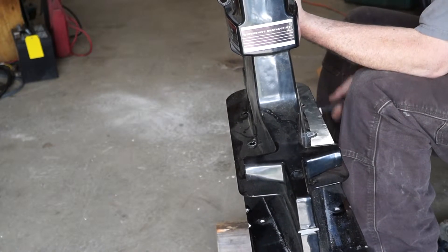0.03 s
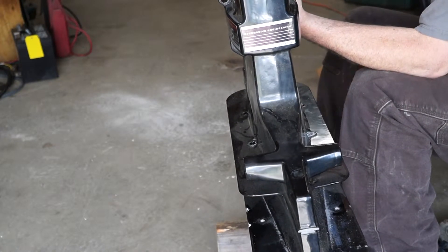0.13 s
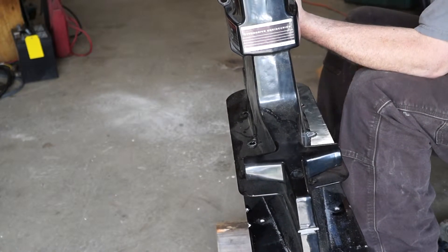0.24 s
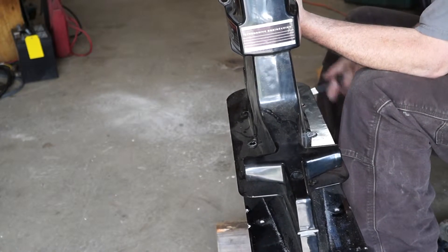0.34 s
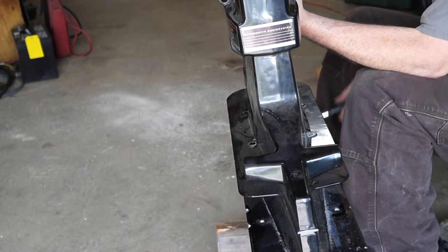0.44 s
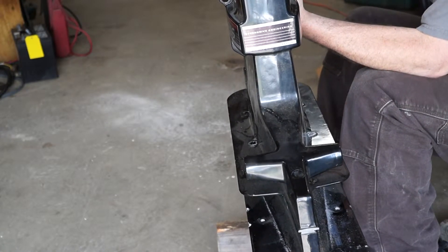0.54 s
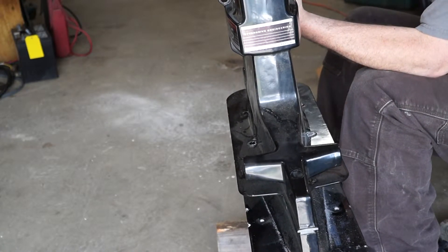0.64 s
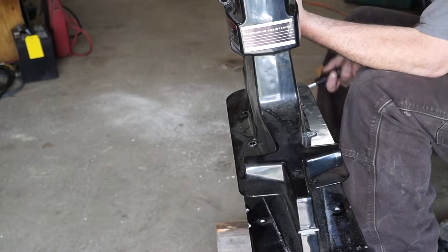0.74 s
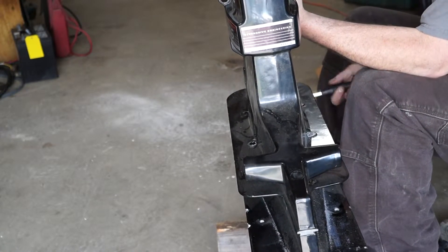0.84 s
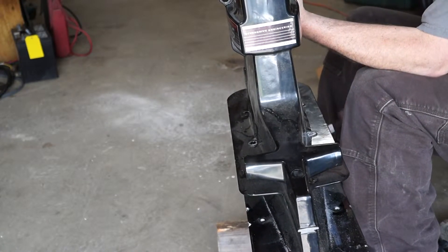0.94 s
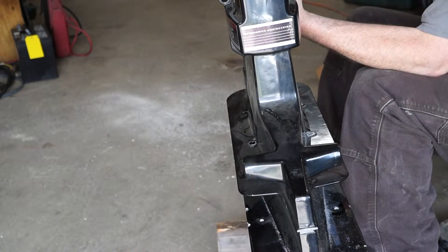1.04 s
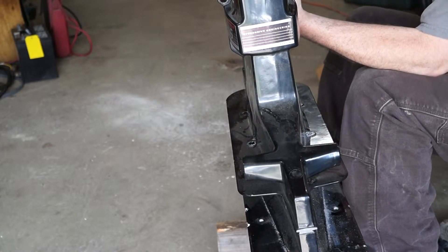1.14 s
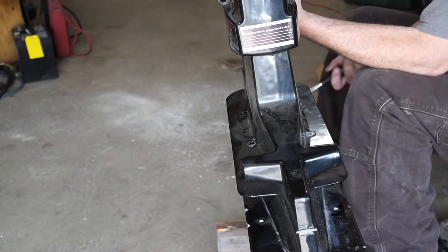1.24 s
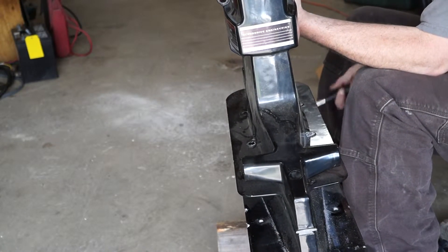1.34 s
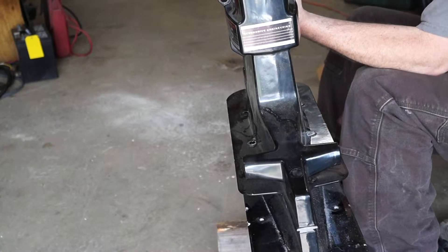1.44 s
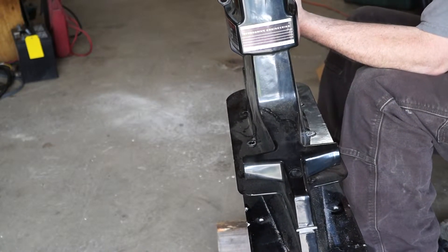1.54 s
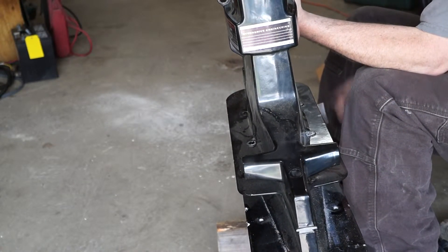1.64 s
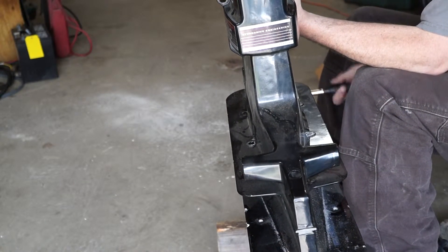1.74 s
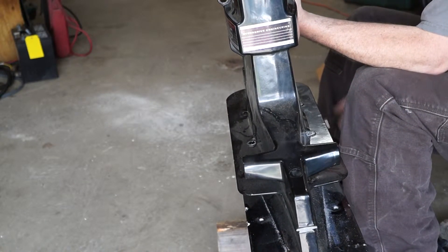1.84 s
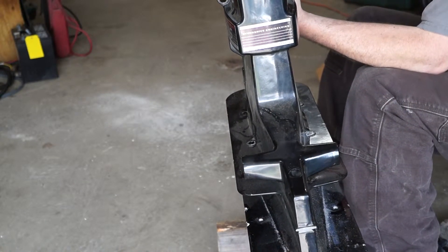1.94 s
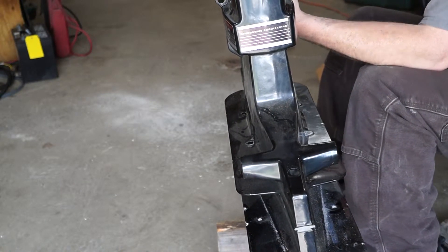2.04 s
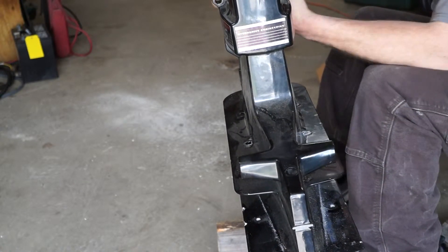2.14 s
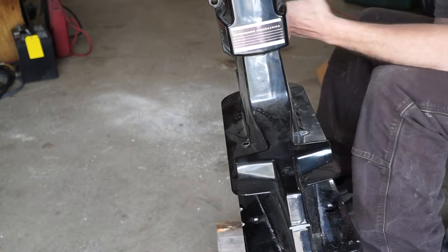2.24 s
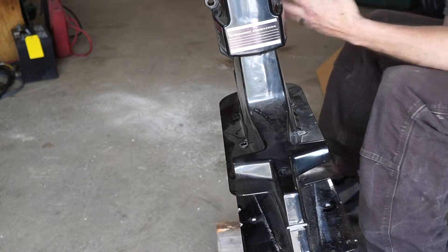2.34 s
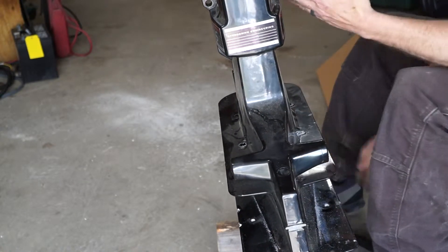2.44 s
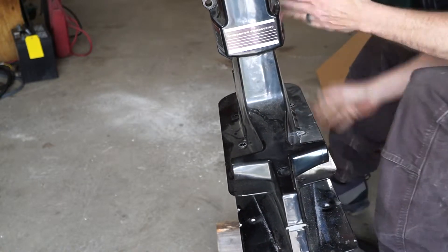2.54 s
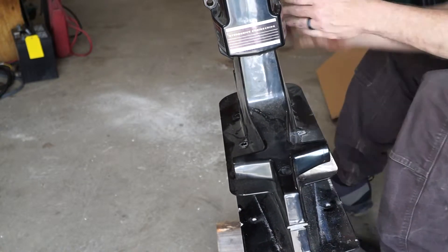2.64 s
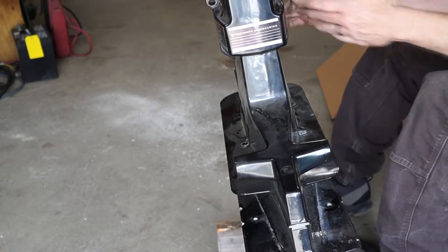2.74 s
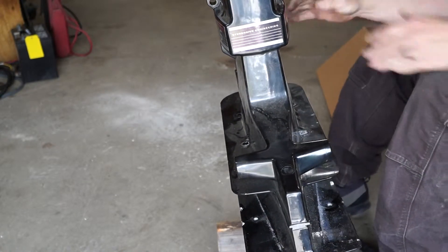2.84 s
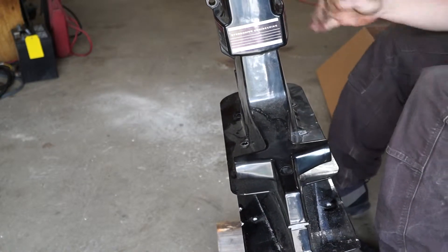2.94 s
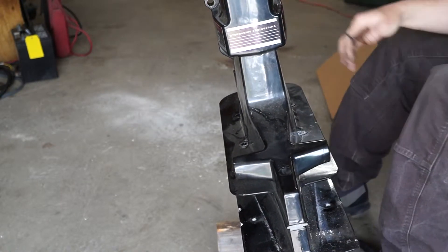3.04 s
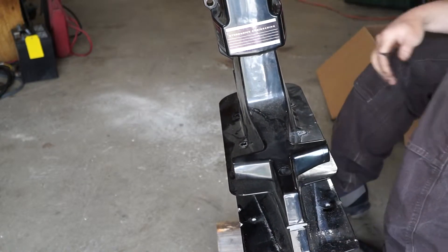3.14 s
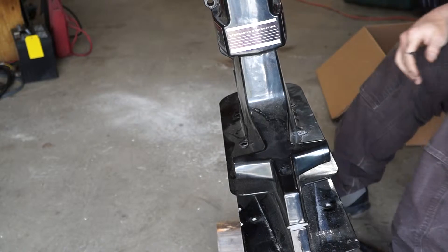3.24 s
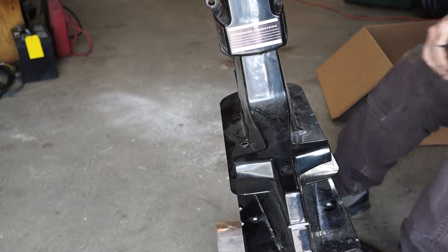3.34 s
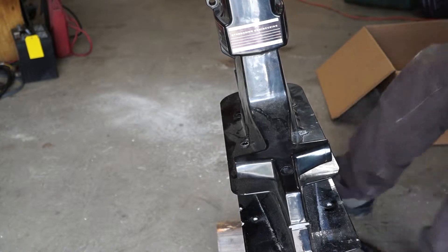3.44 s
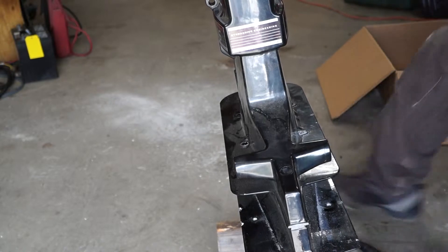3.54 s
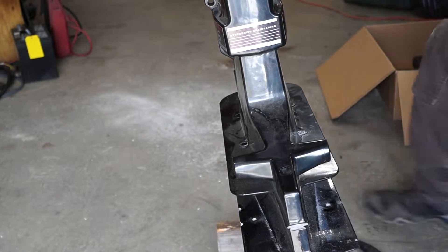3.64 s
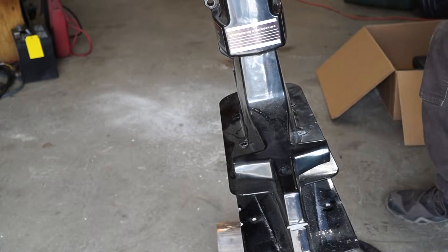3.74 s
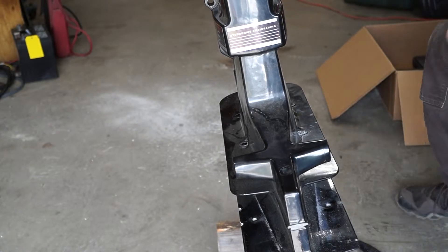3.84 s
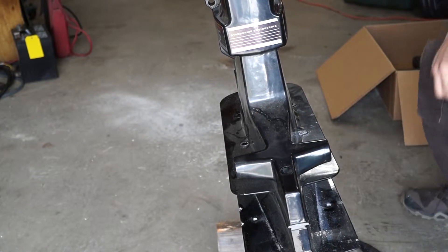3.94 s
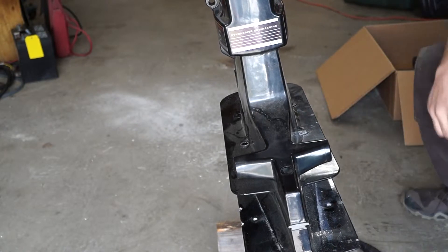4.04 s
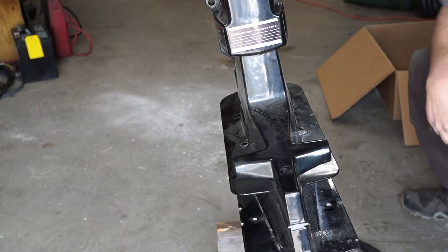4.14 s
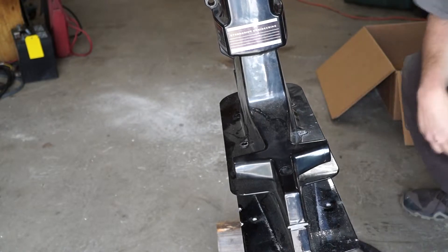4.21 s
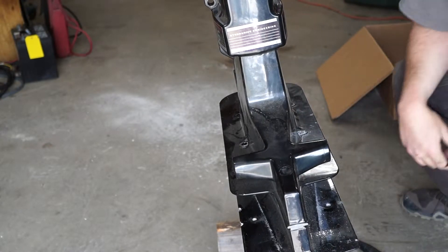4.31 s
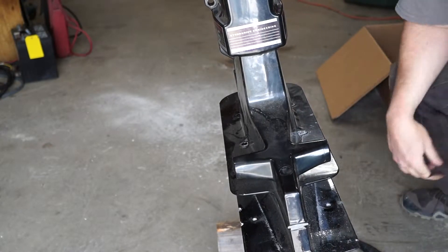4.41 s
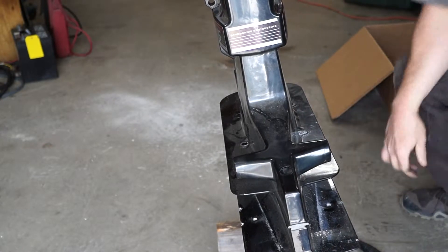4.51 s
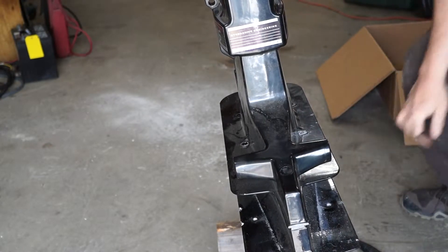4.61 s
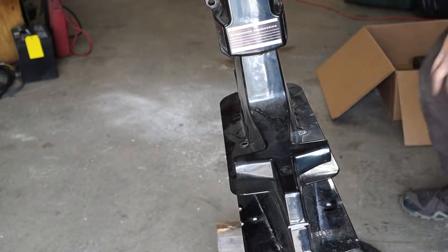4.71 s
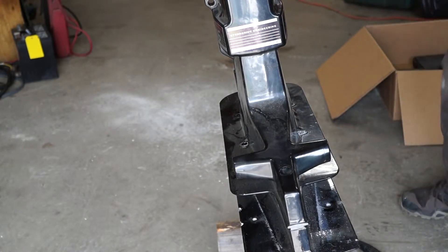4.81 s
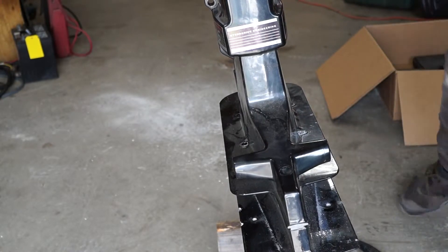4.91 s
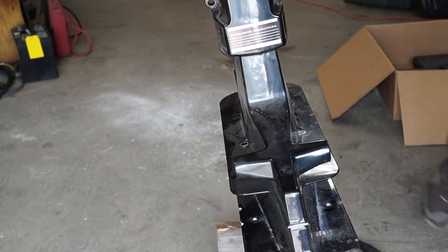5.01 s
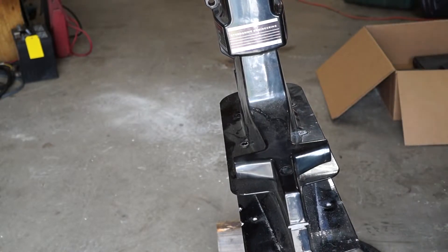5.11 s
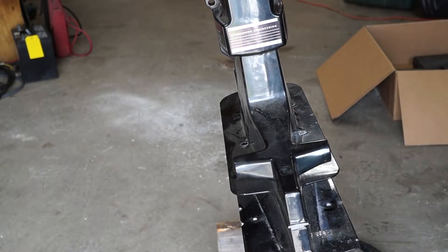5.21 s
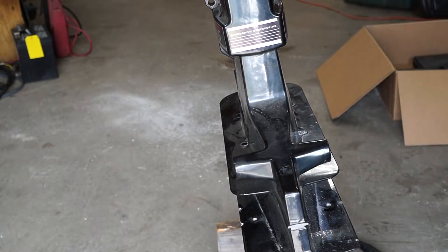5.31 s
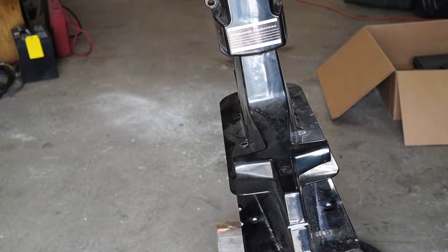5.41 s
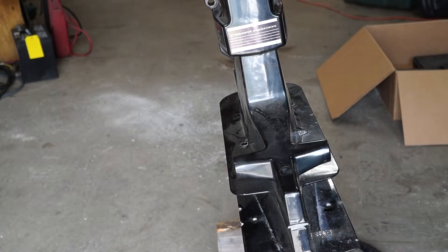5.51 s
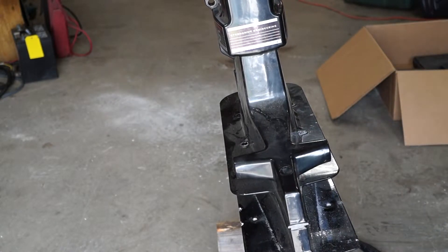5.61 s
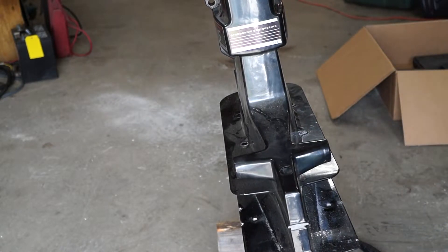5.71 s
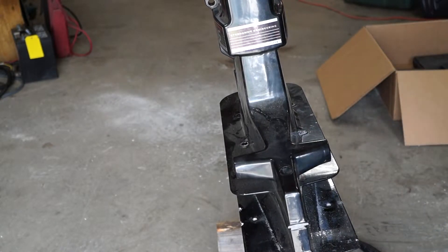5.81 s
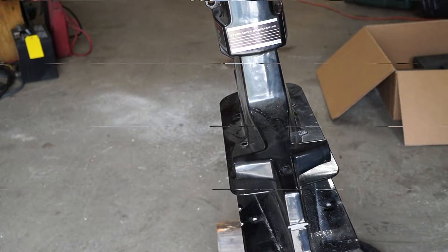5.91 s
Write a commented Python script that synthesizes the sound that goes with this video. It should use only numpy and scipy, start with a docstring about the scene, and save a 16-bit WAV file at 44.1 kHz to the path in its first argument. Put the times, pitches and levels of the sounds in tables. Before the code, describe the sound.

Close stereo pickup of garage work: four separate metallic blows with brief ringing, one duller and bouncing. Then a tool lands and bounces once, knees and shoes thump softly, fabric scuffs, a hand or leg drags on the metal, and a bright tiny click snaps. Quieter steps and ticks lead to a little metal clatter. Short hard-room echo, steady soft air hum and deep floor rumble throughout.

```python
"""A mallet drives a steel punch against a cast metal drive housing in a concrete garage; each blow
rings the casting's modes under a short noise crack. The mallet is then laid down and bounces, and
the worker gets up and walks off: filtered noise rustles and drags, damped low modes thump, a bright
snap clicks twice, a small tool clatters, a faint tone swells. From start to end a close pair of
microphones hears it over a steady hum of air and a wandering rumble of the floor slab."""
import sys
import numpy as np
from scipy import signal
from scipy.fft import rfft, irfft, next_fast_len
from scipy.io import wavfile

SR = 44100
rng = np.random.default_rng(int(sys.argv[2]) if len(sys.argv) > 2 else 0)


def inscribe(sig):
    """Save sig as 16-bit PCM at rate SR to the path in sys.argv[1].

    A 1-D sig is mono; a 2-D sig holds one channel per row.
    Samples are clipped to [-1, 1] before scaling.
    """
    pcm = np.round(np.clip(np.atleast_2d(sig).T, -1, 1) * 32767)
    wavfile.write(sys.argv[1], SR, pcm.astype(np.int16))


N = 262817
LEAD = SR // 4   # run-up before time 0, cut off at the end
M = N + LEAD
TIME_S = (np.arange(M) - LEAD) / SR
FADE_S = 0.034   # fade in and out of drags and of the tone


def from_db(db):
    """Decibels to gain."""
    return 10 ** (np.asarray(db) / 20)


def rms_one(x):
    """Scale to rms 1."""
    return x / np.sqrt(np.mean(x ** 2) + 1e-20)


def sample_at(seconds):
    """Sample index of each moment, run-up included."""
    return np.round(np.array(seconds) * SR).astype(int) + LEAD


def at_hz(points, hz):
    """Read a spectrum table on a log-frequency axis."""
    table_hz, values = np.array(points).T
    return np.interp(np.log(np.maximum(hz, 1)), np.log(table_hz), values)


def in_time(rows):
    """Draw each column of a curve table as a line, sample by sample."""
    s, *columns = np.transpose(rows)
    return [np.interp(TIME_S, s, column) for column in columns]


def coloured(spectrum, share=((1, 1), (2, 1))):
    """White noise filtered to a spectrum, or to a share (Hz, 0-1) of it; rms 1."""
    size = next_fast_len(M)
    hz = np.arange(size // 2 + 1) * SR / size
    gain = from_db(at_hz(spectrum, hz)) * np.sin(np.pi / 2 * at_hz(share, hz)) ** 2
    return rms_one(irfft(rfft(rng.standard_normal(size)) * gain, size)[:M])


# centres of lows, mids, highs and top: (frequency [Hz])
BAND_CENTRES = [200, 800, 2800, 8000]


def four_bands(spectrum):
    """Split a noise colour into lows, mids, highs and top, overlapping smoothly, each rms 1."""
    shares = [list(zip(BAND_CENTRES, share)) for share in np.eye(4)]
    return np.array([coloured(spectrum, share) for share in shares])


def by_band(level_db, colour, fall_db):
    """Levels of the four bands: loudest at the colour, falling by (downward, upward) dB per band."""
    away = np.arange(4) - colour[:, None]
    slope = np.where(away < 0, fall_db[0], fall_db[1])
    return level_db[:, None] - slope * np.abs(away)


def flicker(rate_hz, depth_db):
    """A gain that wanders as smoothed noise, at about the given rate."""
    r = np.exp(-2 * np.pi * rate_hz / SR)
    settle = 9000   # samples dropped while the smoothing settles
    wander = signal.lfilter([1], [1, -2 * r, r * r], rng.standard_normal(M + settle))[settle:]
    return from_db(depth_db * rms_one(wander))


def swells(rows):
    """Gain that fades in, holds and fades out for each (start [s], length [s], level [dB])."""
    gain = np.zeros(M)
    for start, length, db in rows:
        to_edge = np.minimum(TIME_S - start, start + length - TIME_S)
        gain += from_db(db) * np.clip(to_edge / FADE_S, 0, 1) ** 2
    return gain


def ring(force, hz, t60):
    """Resonator: a unit click sets a decaying sine of height 1 ringing."""
    r, w = from_db(-60 / (max(t60, .001) * SR)), 2 * np.pi * hz / SR
    return signal.lfilter([0, np.sin(w)], [1, -2 * r * np.cos(w), r * r], force + 1e-18)


def struck(modes, times, strength_db, spread_db):
    """Every hit rings every mode; the spot struck changes each share and sign at random."""
    at, out = sample_at(times), np.zeros(M)
    chance = rng.normal(0, 1, (len(at), len(modes), 2))
    for k, (hz, level_db, t60) in enumerate(modes):
        force = np.zeros(M)
        hit_db = strength_db + level_db + spread_db * chance[:, k, 1]
        force[at] = np.sign(chance[:, k, 0]) * from_db(hit_db)
        out += ring(force, hz, t60)
    return out


def cracks(noise, times, band_db, t60s, rise_s):
    """The contact itself: a burst of noise that dies fast."""
    out, t = np.zeros(M), np.arange(SR // 4) / SR
    rises = np.broadcast_to(rise_s, len(times))
    for s, levels, t60, rise in zip(times, band_db, t60s, rises):
        i = round(s * SR) + LEAD
        shape = ((1 - np.exp(-t / rise)) * from_db(-60 * t / max(t60, .002)))[:M - i]
        bursts = shape * noise[:, i:i + len(shape)]
        # each band carries a set energy
        even = np.linalg.norm(shape) / np.linalg.norm(bursts, axis=1)
        out[i:i + len(shape)] += (from_db(levels) * even) @ bursts
    return out


def dropped(noise, modes, events, fall_db):
    """A knock on a solid object: its own ring and a crack."""
    s, ring_db, crack_db, colour, t60, rise = np.transpose(events)
    rings = struck(modes, s, ring_db, spread_db=2.2)
    return np.array([rings, cracks(noise, s, by_band(crack_db, colour, fall_db), t60, rise)])


# modes of casting and punch, one row a part (frame, walls, fin, rib, flanges, punch):
# (frequency [Hz], relative level [dB], t60 [s])
HOUSING_MODES = [
    [(215, -2, .22), (320, -10, .12), (385, -7, .15), (432, -5, .15), (455, -6, .2), (486, -2, .26),
     (510, -6, .15), (584, -8, .2)],
    [(1287, -3, .45), (1933, -3, .2), (1610, -6, .25), (2160, -7, .25)],
    [(1422, -5, .55), (1469, -11, .55), (1521, -2, .5), (1536, 0, .56)],
    [(2250, 0, .55)],
    [(2517, 0, .33), (2823, -2, .28), (3020, -1, .28), (3105, -2, .25), (3295, -4, .22), (3630, -10, .55),
     (4168, -13, .5), (4438, -12, .4), (5430, -10, .28), (7430, -15, .4), (7850, -11, .22)],
    [(4883, -4, .36), (6196, -5, .22), (6783, -1, .22), (8893, -3, .22), (9647, 0, .16), (10480, -8, .18),
     (11350, -8, .2), (12140, -13, .16)],
]
UPPER_FRAME_MODES = HOUSING_MODES[0][2:]   # light contacts miss the frame's two deepest modes
# mallet blows: (time [s], ring [dB], dullness [about 0-1], walls [dB], rib [dB], punch [dB],
# crack [dB], crack colour [0 lows - 3 top], crack t60 [s])
MALLET_BLOWS = [(-.170, -30, -.1, -36, -25, -50, -5.5, 2.14, 0.02),
                (0.2685, -24.5, 0.0, -49, -34, -63, -1.5, 1.93, .013),
                (0.6916, -16, 1.03, -25, -65, -58, -20, .8, 0.044),
                (1.1914, -20.5, 0.16, -27.5, -21.5, -59, -6, 2.05, 0.018),
                (1.6339, -17, 0.52, -34, -38.5, -26, -8, 1.46, 0.019)]
# ring of a square and of a dull blow, relative to the blow: (frame [dB], fin [dB], flanges [dB])
SQUARE_BLOW, DULL_BLOW = [0, 0, -5], [0, -17.5, -29]
# a hand or leg drags along the housing: (start [s], length [s], level [dB])
DRAGS = [(2.56, 0.25, -56), (3.09, 0.33, -41), (3.34, 0.334, -49)]


def housing(noise):
    """Blows ring the parts of the casting and crack; a dragging hand or leg hums the frame."""
    s, ring_db, dullness, walls, rib, punch, crack_db, colour, crack_t60 = np.transpose(MALLET_BLOWS)
    frame, fin, flanges = (ring_db + square + dullness * (dull - square)
                           for square, dull in zip(SQUARE_BLOW, DULL_BLOW))
    part_levels = [frame, walls, fin, rib, flanges, punch]
    rings = sum(struck(modes, s, db, spread_db=1.15) for modes, db in zip(HOUSING_MODES, part_levels))
    rough = rng.standard_normal(M)
    hum = rms_one(sum(from_db(db) * ring(rough, hz, t60) for hz, db, t60 in UPPER_FRAME_MODES))
    rings += swells(DRAGS) * hum
    crack_levels = by_band(crack_db, colour, fall_db=(8, 8))
    return np.array([rings, cracks(noise, s, crack_levels, crack_t60, rise_s=0.0014)])


# bounces and bumps: (time [s], ring [dB], crack [dB], crack colour [0-3], crack t60 [s], rise [s])
FRAME_BUMPS = [(0.714, -25, -9.5, 1.7, 0.021, 0.0016), (0.793, -53, -10.5, 1.7, 0.0092, 0.0011),
               (3.351, -26, -21.5, 2.53, 0.084, 0.0044), (3.398, -21.5, -13.5, 3, 0.04, 0.0017),
               (3.417, -35, -17.5, 2.05, 0.059, 0.0056)]


def bumps(noise):
    """Light contacts crack and ring only the upper modes of the frame."""
    return dropped(noise, UPPER_FRAME_MODES, FRAME_BUMPS, fall_db=(6, 6.5))


# the mallet's head and handle: (frequency [Hz], relative level [dB], t60 [s])
MALLET_MODES = [(523, -1, .22), (585, -4, .22), (813, -7, .15), (1061, -7, .1), (1700, -6, .17),
                (1720, -5, .2), (2853, -10, .15), (3763, -16, .15)]
# laid down and bouncing: (time [s], ring [dB], crack [dB], crack colour [0-3], crack t60 [s], rise [s])
MALLET_LANDINGS = [(2.1674, -21, -6, 1.8, 0.0093, 0.0012), (2.2335, -22, -8.5, 1.38, 0.011, 0.00075)]


def laid_mallet(noise):
    """The mallet's own modes ring as it lands and bounces."""
    return dropped(noise, MALLET_MODES, MALLET_LANDINGS, fall_db=(12, 11.5))


# a small steel tool: (frequency [Hz], relative level [dB], t60 [s])
TOOL_MODES = [(830, -2, .12), (1776, -12, .2), (2768, -6, .3), (2803, -3, .33), (2850, -8, .25),
              (3110, -8, .12), (4050, -6, .15), (4544, -12, .25), (5701, -10, .18), (6874, -12, .25),
              (7494, -6, .28), (8306, -13, .22)]
# knocked about: (time [s], ring [dB], crack [dB], crack colour [0-3], crack t60 [s], rise [s])
TOOL_KNOCKS = [(5.203, -51, -16, 2.64, 0.085, 0.0015), (5.213, -26, -13, 2, 0.005, 0.0012),
               (5.221, -29, -12, 1.8, .013, 0.0014), (5.234, -28, -31, 1.5, 0.008, 0.00088),
               (5.316, -52, -22.5, 3, 0.015, 0.00097)]


def clatter(noise):
    """A small steel tool rings and cracks at every knock."""
    return dropped(noise, TOOL_MODES, TOOL_KNOCKS, fall_db=(11, 8.5))


# ticks, snaps and small knocks: (time [s], level [dB], colour [band, 0 lows - 3 top], t60 [s])
SMALL_KNOCKS = [(0.245, -37, 2.5, 0.031), (1.795, -43.5, 2.6, .033), (2.018, -33.5, 1.3, 0.053),
                (2.026, -24.5, 2.96, 0.018), (2.395, -20.5, 1.5, 0.016), (2.555, -30, 1.5, 0.014),
                (2.655, -36, 2, 0.014), (3.912, -31, 0.99, 0.016), (4.076, -26.5, 3.9, .025),
                (4.215, -37.5, 0.27, 0.025), (4.96, -24.5, 2.52, 0.02), (5.126, -37, 1.44, 0.018),
                (5.331, -30.5, 2, 0.017), (5.45, -28, 1.77, 0.022), (5.47, -30.5, 1.6, 0.019),
                (5.938, -33, 2.38, 0.036)]


def knocks(noise):
    """Ticks and small knocks: short noise bursts without a ring."""
    s, db, colour, t60 = np.transpose(SMALL_KNOCKS)
    return cracks(noise, s, by_band(db, colour, fall_db=(8.5, 7)), t60, rise_s=0.00041)


# shoes and knees, soft thumps and dull taps: (time [s], level [dB], pitch [Hz])
SOFT_THUMPS = [(2.354, -22, 191), (2.395, -23, 265), (2.465, -26.5, 237), (2.54, -28.5, 226),
               (2.556, -29.5, 298), (2.641, -37, 178), (3.359, -24.5, 219), (3.399, -26.5, 227),
               (3.604, -49, 200), (3.912, -29.5, 211), (3.961, -35.5, 269), (4.052, -33.5, 248),
               (4.101, -34.5, 219), (4.127, -41, 240), (4.715, -31, 357), (4.74, -34.5, 365),
               (4.995, -28.5, 412), (5.13, -37, 420), (5.407, -33, 188), (5.47, -31, 386),
               (5.472, -22, 1380)]
CYCLES_TO_60_DB, OVERTONE_RATIO, OVERTONE_DB = 13.5, 1.65, -2


def thumps():
    """Each soft weight on the floor rings two heavily damped modes."""
    out, t = np.zeros(M), np.arange(SR // 4) / SR
    for s, db, hz in SOFT_THUMPS:
        i = round(s * SR) + LEAD
        wave = np.sin(2 * np.pi * hz * t)
        wave += from_db(OVERTONE_DB) * np.sin(2 * np.pi * OVERTONE_RATIO * hz * t)
        out[i:i + len(t)] += from_db(db - 60 * t * hz / CYCLES_TO_60_DB) * wave
    return out


SNAP_S, SNAP_ECHO_S = 3.2011, 0.0037   # first click; delay of the floor's repeat
SNAP_DB, EDGE_DB = -7.5, -7.5   # click; its sharp edge relative to that
SNAP_HZ, SNAP_T60_S = 7730, .002


def snap():
    """A thin click repeated once by the floor, each a sharp edge and a very short treble ring."""
    clicks = np.zeros(M)
    clicks[sample_at([SNAP_S, SNAP_S + SNAP_ECHO_S])] = from_db(SNAP_DB)
    edges = np.diff(clicks, n=2, prepend=[0, 0])
    return ring(clicks, SNAP_HZ, SNAP_T60_S) + from_db(EDGE_DB) * edges


# the worker moves: (time [s], level [dB], tilt [dB per band toward the top])
MOVEMENTS = [(1.75, -60.5, -8), (2.07, -56, 1.5), (2.3, -74.5, 12), (2.42, -47, -3), (2.69, -59.5, 2),
             (2.78, -64, -2), (2.95, -58.5, 1.3), (3.04, -47, 3), (3.27, -59.5, -2), (3.4, -42, -0.5),
             (3.56, -57, -4.5), (3.65, -54.5, 3), (3.84, -55, -3), (4.0, -58, 1), (4.35, -63.5, 1.7),
             (4.54, -57, 4.5), (4.63, -55, 0.5), (4.73, -51.5, 2), (4.8, -53, 3), (4.93, -46, 3.5),
             (5.06, -59.5, -2), (5.24, -59, .3), (5.38, -54, 1), (5.55, -59.5, 0.5), (5.77, -56, -1.5),
             (5.96, -65.5, 1.5)]
# colour of rustle and scuff: (frequency [Hz], relative density [dB per Hz])
CLOTH_COLOUR = [(40, -54), (100, 13), (200, -0.5), (480, 0.5), (900, -5.5), (2000, 1.5), (4000, 2),
                (5500, 1.5), (7500, 2), (9000, -2), (11000, -14), (14000, -11), (16500, -67)]


def cloth():
    """Cloth and soles rub: four noise bands swell with each movement, brighter or duller."""
    level_db, tilt_db = in_time(MOVEMENTS)
    fade_in = np.clip((TIME_S - MOVEMENTS[0][0]) * 10, 0, 1)
    gains = from_db(level_db + tilt_db * (np.arange(4)[:, None] - 1.5))
    rustle = np.sum(four_bands(CLOTH_COLOUR) * gains, axis=0)
    return fade_in * flicker(30.0, depth_db=2.5) * rustle


TONE_SWELLS = [(5.7, .17, -51.5)]   # (start [s], length [s], level [dB])


def tone():
    """A faint tone: noise held in one narrow resonance near 600 Hz."""
    return swells(TONE_SWELLS) * rms_one(ring(rng.standard_normal(M), hz=615, t60=0.14))


# reverberation: (frequency [Hz], t60 [s])
GARAGE_T60 = [(100, 0.2), (300, 0.63), (1000, 0.49), (3000, 0.43), (7000, 0.41), (12000, 0.31),
              (16000, 0.22)]
# stereo width, for garage and air, each adding its own offset: (frequency [Hz], side minus mid [dB])
SIDE_LEVELS = [(60, -24), (125, -26), (250, -22), (600, -15.5), (1200, -16), (2500, -14), (5000, -22),
               (8000, -15), (11000, -28), (15000, -53)]
ECHO_RISE_S = 0.00067


def garage(x):
    """Dense echoes, longest near 300 Hz and shorter in the treble; the sides differ only a little."""
    size, t = next_fast_len(M + SR), np.arange(SR) / SR
    white, echo = rng.standard_normal((2, 2, SR)), np.zeros((2, SR))
    for k, hz in enumerate(63 * 2 ** np.arange(0, 8.1, .5)):   # half-octave bands
        edges = [hz / 2 ** .25, hz * 2 ** .25]
        sos = signal.butter(2, edges, "band", fs=SR, output="sos")
        decay = from_db(-60 * t / at_hz(GARAGE_T60, hz)) * (1 - np.exp(-t / ECHO_RISE_S))
        band = signal.sosfilt(sos, white[k % 2]) * decay
        band *= np.sqrt(hz) / np.linalg.norm(band, axis=1, keepdims=True)   # equal energy per Hz
        echo += band * from_db([[0], [at_hz(SIDE_LEVELS, hz) + 3.8]])
    echo /= np.linalg.norm(echo[0])
    mid, side = irfft(rfft(x, size) * rfft(echo, size), size)[:, :M]
    return np.array([mid + side, mid - side])


# shakes from blows and heavy steps: (time [s], level before rise and decay [dB], t60 [s])
SLAB_SHAKES = [(.27, -70, 0.23), (.78, -59, 0.87), (1.634, -53, 0.73), (2.35, -55, 0.86), (3.08, -60, 0.49),
               (3.35, -58, .8), (3.91, -49, .4), (4.66, -60, 0.78), (5.22, -40.5, 0.68)]
SLAB_BED_DB, SLAB_WANDER_DB, SLAB_RISE_S = -66.5, 4.5, 0.024


def slab():
    """Deep rumble of the floor: a wandering noise bed, swelling after each shake."""
    gain = from_db(SLAB_BED_DB) * flicker(2.5, SLAB_WANDER_DB)
    for s, db, t60 in SLAB_SHAKES:
        after = np.maximum(TIME_S - s, 0)
        gain = gain + (1 - np.exp(-after / SLAB_RISE_S)) * from_db(db - 60 * after / max(t60, .05))
    return gain * coloured([(15, -37), (30, -7), (50, -7.0), (80, -4.5), (160, -33), (20000, -120)])


# colour of the air: (frequency [Hz], relative density [dB per Hz])
AIR_COLOUR = [(20, -34), (50, -6), (100, -4), (200, 0), (480, -2.5), (900, -12.5), (2000, -14), (5500, -16),
              (7500, -15.5), (9000, -22.5), (11000, -35), (16500, -26)]


def air():
    """Steady hum and hiss of the building: a shared noise and a weaker one opposed left to right."""
    side_colour = [(hz, db + at_hz(SIDE_LEVELS, hz)) for hz, db in AIR_COLOUR]
    mid = coloured(AIR_COLOUR)
    side = from_db(-7.0) * coloured(side_colour) * np.array([[1], [-1]])
    return from_db(-54.5) * (mid + side)


# colour of hard contacts: (frequency [Hz], relative density [dB per Hz])
CONTACT_COLOUR = [(40, -27), (100, 12.5), (200, 9.5), (480, 24), (900, 19), (2000, 0.5), (4000, -3),
                  (5500, -5.5), (7500, -5), (9000, -12.5), (11000, -25.5), (14000, -33.5), (16500, -42)]
# echo levels relative to the direct sound [dB]: rings and tone, cracks and cloth, knocks, thumps, snap
ROOM_DB = [-13, 3, 4.5, -4, 5]
LOW_CUT_HZ = 143.4


def scene():
    """All contacts sound in the garage, over the air and the slab's rumble."""
    noise = four_bands(CONTACT_COLOUR)
    rings, contacts = housing(noise) + bumps(noise) + laid_mallet(noise) + clatter(noise)
    sources = np.array([rings + tone(), contacts + cloth(), knocks(noise), thumps(), snap()])
    near = sources.sum(axis=0) + garage(from_db(ROOM_DB) @ sources)
    # small things give no deep bass
    near = signal.sosfilt(signal.butter(4, LOW_CUT_HZ, "high", fs=SR, output="sos"), near)
    return (near + air() + slab())[:, LEAD:]


RIGHT_LIFT_HZ, RIGHT_LIFT_DB = 8850, -24   # resonance added on the right, taken off on the left
CUTOFF_HZ = 16700


def record(dry):
    """The right microphone is a little brighter than the left; the top is cut."""
    bright = signal.lfilter(*signal.iirpeak(RIGHT_LIFT_HZ, 2, fs=SR), dry.mean(axis=0))
    dry = dry + from_db(RIGHT_LIFT_DB) * bright * np.array([[-1], [1]])
    return signal.sosfilt(signal.cheby2(12, 70, CUTOFF_HZ, fs=SR, output="sos"), dry)


dry = scene()
out = record(dry)
inscribe(out)
```